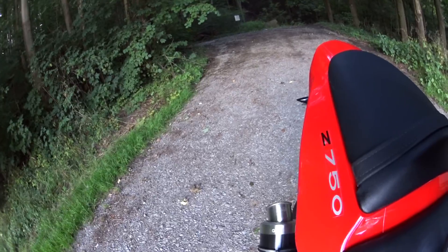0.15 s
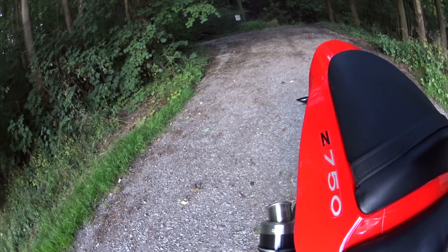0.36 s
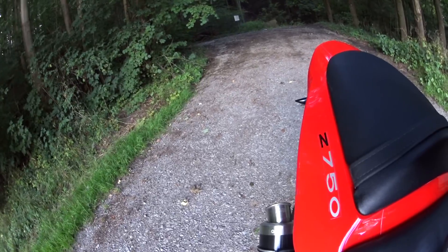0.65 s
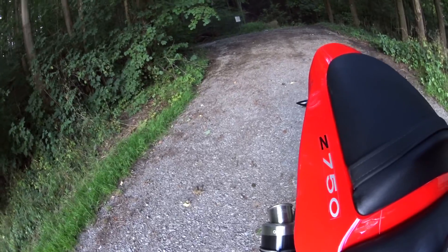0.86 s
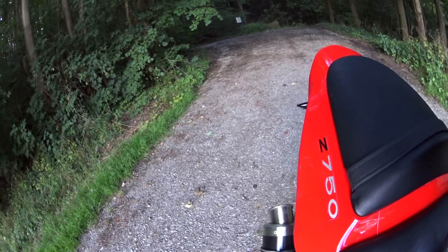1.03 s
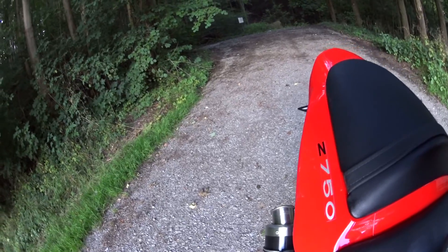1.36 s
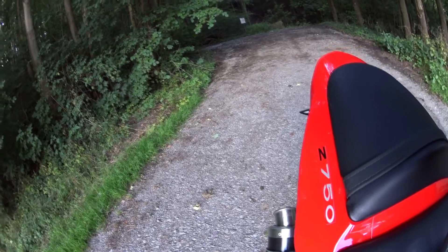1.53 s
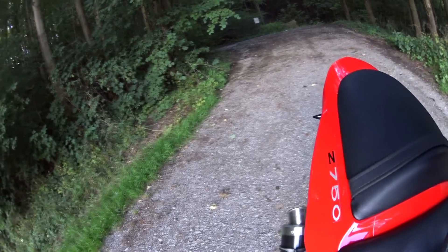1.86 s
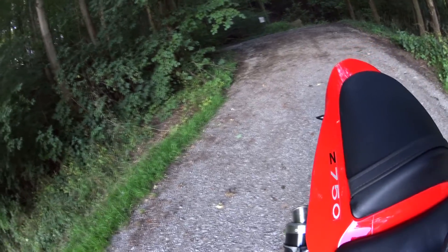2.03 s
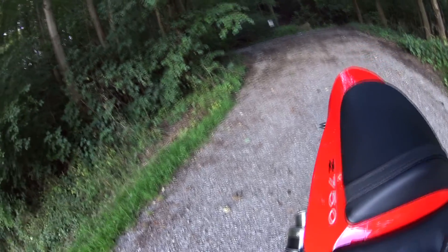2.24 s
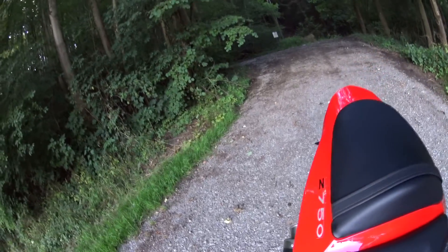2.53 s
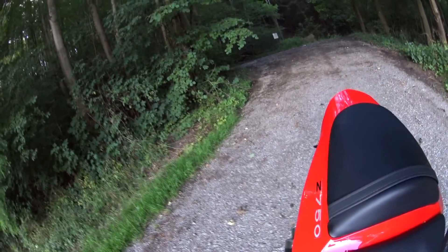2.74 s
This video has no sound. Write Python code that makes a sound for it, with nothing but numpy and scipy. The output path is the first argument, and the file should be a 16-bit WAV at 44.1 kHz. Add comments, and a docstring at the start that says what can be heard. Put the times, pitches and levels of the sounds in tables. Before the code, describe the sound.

A standing four-cylinder motorcycle falls from a high, raspy howl to a low throb, with two crackling backfire bursts, a near-stall stumble with metallic knocks, then idle; heard close to the silencer on a forest track.

```python
"""Motorcycle winding down

A four-cylinder motorcycle, standing on a forest track, winds down after a blip of the throttle.
The exhaust falls from a smooth howl (sine waves) to separate thumps (filtered pulses), with rushing gas and
clatter (coloured noise) and a whine and growl (sine waves). It backfires in two bursts (pressure pulses and
noise), stumbles with two knocks and settles into idle. We listen by the silencer; trees echo the backfires."""
import sys
import numpy as np
from scipy import signal
from scipy.fft import rfft, irfft, next_fast_len
from scipy.io import wavfile
from scipy.ndimage import uniform_filter1d, map_coordinates

SR = 44100
rng = np.random.default_rng(int(sys.argv[2]) if len(sys.argv) > 2 else 0)


def bounce(signal):
    """Save signal as a 16-bit WAV file at the path given by the first command-line argument."""
    frames = np.transpose(np.atleast_2d(signal))
    limited = np.clip(frames, -1, 1)
    pcm = np.round(limited * 32767).astype(np.int16)
    wavfile.write(sys.argv[1], SR, pcm)


N = 127890

# How fast the engine runs. Each row: time in seconds, firings per second.
ENGINE_RATE = [(0.0, 374.8), (0.1, 346.0), (0.25, 306.3), (0.4, 266.3), (0.55, 233.1), (0.7, 197.1),
               (0.9, 163.1), (1.05, 139.1), (1.25, 115.6), (1.45, 92.8), (1.6, 76.7), (1.75, 63.6),
               (1.87, 53.3), (2.0, 48.2), (2.15, 45.0), (2.28, 42.6), (2.43, 45.7), (2.6, 44.1),
               (2.9, 43.7)]
TOP_HZ = 11150  # upper limit of the sound


def amp(db):
    """Turn decibels into a gain."""
    return 10 ** (np.asarray(db) / 20)


def unit(x):
    """Scale a signal to an rms of 1."""
    return x / np.sqrt(np.mean(x ** 2) + 1e-20)


def along(points, hz):
    """Read (Hz, value) points at any frequency, on a logarithmic axis."""
    f, v = np.transpose(points)
    return np.interp(np.log(hz + 1), np.log(f + 1), v)


def curve(points):
    """Turn (seconds, value) points into one value per sample."""
    return np.interp(np.arange(N) / SR, *np.transpose(points))


def wobble(rate):
    """Make a smooth random curve with this many random points a second."""
    points = rng.standard_normal(4096)
    return map_coordinates(points, [np.arange(N) * rate / SR + 2], mode="mirror")


def filtered(x, response):
    """Multiply the spectrum of x by a response that depends on frequency."""
    m = next_fast_len(N + SR // 2)
    spectrum = rfft(x, m) * response(np.fft.rfftfreq(m, 1 / SR))
    return irfft(spectrum, m)[..., :N]


def ringing(x, colour, size=8192):
    """Filter x to a colour so that every pulse rings only after it strikes (minimum phase)."""
    gain = amp(along(colour, np.fft.rfftfreq(size, 1 / SR)))
    cepstrum = irfft(np.log(gain))
    fold = np.r_[1, np.full(size // 2 - 1, 2), np.zeros(size // 2)]
    impulse = irfft(np.exp(rfft(cepstrum * fold)))
    return signal.fftconvolve(x, impulse)[:N]


def noise(colour):
    """Stereo noise with a colour and the metalwork's narrow rings; its middle part has rms 1."""
    # Likeness of left and right. Each row: frequency in Hz, correlation (held between -1 and 1).
    alike = [(100, 2.5), (300, 0.46), (700, 1), (2000, 0.9), (9000, 0.8)]
    # Narrow rings of the metalwork. Each row: frequency in Hz, width in Hz, boost in dB.
    metal = [(764, 110, 2.5), (1434, 51, 5.5), (2003, 105, 3.5), (2273, 12, 10), (2416, 15, 4.5),
             (4170, 38, 4)]

    def response(hz):
        turn = np.arccos(np.clip(along(alike, hz), -1, 1)) / 2
        rings = sum(db / (1 + (2 * (hz - f) / width) ** 2) for f, width, db in metal)
        gain = amp(along(colour, hz) + rings) * (hz < TOP_HZ)
        return gain * np.array([np.cos(turn), np.sin(turn)])

    mid, side = filtered(rng.standard_normal((2, N)), response)
    return np.array([mid + side, mid - side]) / mid.std()


def firings(phase, colour, sizes, scatter_db, jitter):
    """One ringing pulse per firing, kept at an even level; jitter is a share of the period."""
    k = np.arange(np.ceil(phase[0]), phase[-1])
    chance = rng.standard_normal((1024, 2))[k.astype(int) % 1024]
    at = np.interp(k + jitter * chance[:, 0], phase, np.arange(N))
    push = np.take(sizes, k.astype(int), mode="wrap") * amp(scatter_db * chance[:, 1])
    # share each pulse between its two nearest samples
    i = at.astype(int)
    early = np.bincount(i, push * (1 - at + i), N + 1)
    late = np.bincount(i + 1, push * (at - i), N + 1)
    x = ringing((early + late)[:N], colour)
    power = uniform_filter1d(uniform_filter1d(x ** 2, size=4000), size=4000)
    return x / np.sqrt(np.abs(power) + 1e-12)


def gate(phase, depth, lag):
    """A swell once per firing, of rms 1; lag is a share of the period."""
    return unit(np.exp(depth * np.cos(2 * np.pi * (phase - lag))))


def trees(x, spread_s):
    """The nearest trunks scatter sound back as a blurred echo and a short tail, made from shaped noise."""
    # Each row: frequency in Hz, level in dB.
    echo_colour = [(60, 1), (200, -5.5), (1500, -1), (2300, 2.5), (2900, 4.5), (6000, 1.5), (11000, -1.5)]
    echo_s, echo_db = 0.029, -10.5
    tail_t60_s, tail_db = 0.43, -6  # T60: time to fall by 60 dB
    t = np.arange(SR // 2) / SR
    echo = np.exp(-((t - echo_s) / spread_s) ** 2)
    tail = amp(-60 * t / tail_t60_s)
    shape = amp(echo_db) * echo / np.linalg.norm(echo) + amp(tail_db) * tail / np.linalg.norm(tail)
    wet = signal.fftconvolve(x, shape * rng.standard_normal((2, len(t))), axes=1)[:, :N]
    return filtered(wet, lambda hz: amp(along(echo_colour, hz)))


def clatter():
    """The valve gear clatters: steady coloured noise with a quick random flutter."""
    # Each row: frequency in Hz, level in dB.
    clatter_colour = [(25, -30), (100, -5), (280, 10.5), (400, -2), (520, 4.5), (650, 0.5), (900, 0.5),
                      (1250, -5.5), (1450, 2), (2000, -2), (2600, -4), (3600, -5), (5400, -9),
                      (6300, -19.5), (8000, -18), (10500, -18.5)]
    level_db = -42 + 1.0 * wobble(220)
    return amp(level_db) * noise(clatter_colour)


def burble():
    """Uneven combustion with the throttle shut gives a low burble, made from low noise."""
    # Each row: time in seconds, level in dB.
    burble_level = [(0, -60), (.2, -47), (.4, -39), (.55, -35.5), (.7, -31.5), (.85, -36), (1.05, -30.5),
                    (1.3, -31), (1.5, -34), (1.75, -35), (2.05, -41)]
    # Each row: frequency in Hz, level in dB.
    burble_colour = [(25, -5), (55, -22), (90, 8), (150, 1), (190, 5), (250, 10.5), (330, -16.5),
                     (500, -35)]
    return amp(curve(burble_level)) * noise(burble_colour)


def rushing_gas(phase):
    """Turbulent gas leaves the pipe in puffs: noise that swells gently with each firing."""
    # Levels of the gas's body and its hiss. Each row: time in seconds, level in dB.
    body_level = [(0, -24.5), (.08, -24.5), (.21, -26), (.34, -22.5), (.44, -24), (.52, -27), (.77, -28),
                  (.89, -29), (1.1, -31), (1.36, -34.5), (1.6, -43), (1.85, -55), (2.1, -73)]
    hiss_level = [(.04, -27), (.21, -33.5), (.35, -32.5), (.5, -38), (.85, -44.5), (1.1, -49), (1.4, -77)]
    # Their colours. Each row: frequency in Hz, level in dB.
    body_colour = [(25, -49), (120, -22), (220, 0), (330, 1), (420, -1.5), (620, -0.5), (850, -5.5),
                   (1200, -2), (1480, -0.5), (1900, -4), (2900, -6.5), (4200, -7), (5300, -10.5),
                   (6300, -19.5), (11000, -23)]
    hiss_colour = [(2000, -2.5), (5000, 5), (7500, 3), (9000, 1), (10500, 5), (12000, -22)]
    puffs = gate(phase, depth=0.15, lag=0.56) * amp(0.63 * wobble(44.46))  # wobble in dB
    body = amp(curve(body_level)) * noise(body_colour)
    hiss = amp(curve(hiss_level)) * noise(hiss_colour)
    return puffs * (body + hiss)


def knocks():
    """The drive knocks as the crank nearly stalls: short sine rings that die away."""
    # Each row: start in seconds, starting level in dB.
    knock_times = [(1.894, -29.5), (1.932, -25)]
    knock_hz, knock_t60_s = 1433, 0.028
    out = np.zeros(N)
    for s, db in knock_times:
        t = np.maximum(np.arange(N) / SR - s, 0)
        out += amp(db - 60 * t / knock_t60_s) * np.sin(2 * np.pi * knock_hz * t)
    return out


def backfires():
    """Unburnt fuel goes off in the pipe: a pressure push rings the silencer, with a short spit of gas."""
    # Each row: start in seconds, push level in dB, spit level in dB, spit length before it fades in seconds.
    pops = [(0.2785, -9, -12.5, 0.0079), (0.2864, -8, -21, 0.0016), (0.2928, -4, -17, 0.0024),
            (0.919, -10.5, -22.5, 0.0072), (0.9258, -8, -14.5, 0.0097)]
    # Colours of the spit and the silencer's ring. Each row: frequency in Hz, level in dB.
    spit_colour = [(60, 1), (300, 9.5), (700, 5.5), (1100, -1.5), (1900, 7.5), (2800, 1.5), (4500, -1),
                   (6200, -4.5), (8500, -2.5), (11000, -3.5)]
    boom_colour = [(25, -12), (90, 0), (160, -17.5), (235, 13.5), (320, -8), (420, -2), (650, -3),
                   (1200, -31)]
    spit_attack_s, spit_t60_s, push_s, boom_db = 0.00059, 0.029, 0.00072, 4
    pushes, spits = np.zeros(N), np.zeros(N)
    for s, push_db, spit_db, length in pops:
        t = np.maximum(np.arange(N) / SR - s, 0)
        u = t / push_s
        pushes -= amp(push_db) * np.e * u * (1 - u + u * u / 6) * np.exp(-u)
        fade_db = 60 * np.maximum(t - length, 0) / spit_t60_s
        spits += amp(spit_db - fade_db) * (1 - np.exp(-t / spit_attack_s))
    boom = amp(boom_db) * ringing(pushes, boom_colour)
    return pushes + boom + spits * noise(spit_colour)


def whine(phase):
    """Crank and gears whine: their partials flare up as they slide through the casing's resonances."""
    # Partials. Each row: multiple of the firing rate, level in dB.
    whine_orders = [(4, 4.5), (4.5, -11), (5, -2), (6, -1), (6.5, -16), (7, -6.5), (8, -0.5), (8.6, -4)]
    # Overall level. Each row: time in seconds, level in dB.
    whine_level = [(0, -24.5), (.09, -22.5), (.2, -28), (.43, -25), (.58, -27.5), (.68, -33.5),
                   (.76, -31.5), (.9, -40.5), (1.6, -46.5), (2.0, -57)]
    # Casing resonances. Each row: frequency in Hz, width in Hz, level in dB.
    casing = [(425, 95, -0.5), (666, 93, -4), (1379, 95, -3), (1520, 43, -0.5), (1590, 142, -2.5),
              (2486, 91, -2), (3170, 250, 0)]
    casing_floor_db = -19  # between the resonances
    blur_rad, flutter_db = 0.45, 1.5
    rate, out = curve(ENGINE_RATE), np.zeros(N)
    for k, db in whine_orders:
        power = sum(amp(level) ** 2 / (1 + (2 * (k * rate - hz) / width) ** 4)
                    for hz, width, level in casing)
        casing_gain = np.sqrt(2 * (power + amp(casing_floor_db) ** 2))
        angle = 2 * np.pi * (k * phase + rng.random()) + blur_rad * wobble(130)
        out += casing_gain * amp(db + flutter_db * wobble(50.56)) * np.cos(angle)
    return amp(curve(whine_level)) * out


def growl(phase, waver_db):
    """Unequal cylinders put wavering sine lines halfway between the main multiples of the firing rate."""
    # Partials. Each row: multiple of the firing rate, level in dB.
    growl_orders = [(1.5, 1), (2.5, -5)]
    # Overall level. Each row: time in seconds, level in dB.
    growl_level = [(0, -25.5), (.08, -45), (.45, -40), (.58, -51), (.8, -43), (1.4, -48), (1.7, -77)]
    lines = np.zeros(N)
    for k, db in growl_orders:
        level = amp(db + waver_db * wobble(20))
        angle = 2 * np.pi * (k * phase + rng.random()) + 0.5 * wobble(18)
        lines += level * np.cos(angle)
    return np.sqrt(2) * amp(curve(growl_level)) * lines


def exhaust(phase):
    """Firing pulses: a brassy rasp at speed; towards idle single thumps, each with a chuff of gas."""
    # Levels of the rasp and the thumps, uneven in the stumble. Each row: time in seconds, level in dB.
    rasp_level = [(0, -21), (.08, -22.5), (.2, -26.5), (.42, -30), (.52, -49), (.78, -58), (1.4, -59),
                  (1.9, -69)]
    thump_level = [(.7, -90), (1.2, -30), (1.42, -27), (1.58, -27.5), (1.65, -29.5), (1.68, -25.5),
                   (1.712, -36), (1.735, -26), (1.772, -34.5), (1.79, -24), (1.825, -36.5), (1.862, -33.5),
                   (1.876, -42), (1.892, -28), (1.935, -26.5), (1.975, -33.5), (2.012, -44), (2.03, -28.5),
                   (2.16, -30), (2.32, -31), (2.38, -28.5), (2.9, -28.5)]
    # Colours of the rasp, the silencer's thump and the chuff. Each row: frequency in Hz, level in dB.
    rasp_colour = [(60, -65), (300, -27), (700, -12), (1080, -4), (1400, -10), (1800, -3.5), (2200, -8.5),
                   (3100, -11.5), (4200, -12), (6000, -37), (11000, -53)]
    pipe = [(20, -55), (44, -11.5), (90, -5), (135, -6.5), (176, -9.5), (228, 1), (268, -8.5), (310, -13.5),
            (390, -32.5), (500, -21.5), (600, -44), (1200, -59)]
    chuff_colour = [(200, -17), (600, -1), (1600, 1), (3500, -8), (6000, -18)]
    # Relative strength of each cylinder, in firing order.
    cylinders = [0.85, 1.5, 0.45, 1.1]
    smear_s = 0.009  # the pipe delays the highest frequencies by this much
    chuff_db, chuff_s = -11.5, 0.0035  # level relative to the thump, rise time
    rasp = firings(phase, rasp_colour, cylinders, scatter_db=1, jitter=0.009)
    rasp = filtered(rasp, lambda hz: np.exp(-1j * np.pi * smear_s * hz ** 2 / TOP_HZ))
    thumps = firings(phase, pipe, [1], scatter_db=.9, jitter=.006)
    age = (phase % 1) / curve(ENGINE_RATE) / chuff_s  # time since the firing, in rise times
    chuffs = age * np.exp(1 - age) * amp(chuff_db) * noise(chuff_colour)
    return amp(curve(rasp_level)) * rasp + amp(curve(thump_level)) * (chuffs - thumps)


def howl(phase, waver_db):
    """The smooth exhaust howl: sine waves at one, two and three times the firing rate."""
    # One table for each multiple. Each row: time in seconds, level in dB.
    first = [(0, -17.5), (.09, -17), (.14, -13), (.25, -13.5), (.3, -16.5), (.42, -12.5), (.58, -11.5),
             (.64, -13.5), (.68, -17.5), (.88, -19.5), (.95, -25.5), (1.0, -21), (1.2, -22), (1.4, -21.5),
             (1.5, -26), (1.61, -30.5), (1.7, -70)]
    second = [(0, -31), (.22, -28), (.33, -31.5), (.5, -25.5), (0.701, -27.5), (.85, -32.5), (.96, -30),
              (1.082, -26), (1.2, -20), (1.28, -28), (1.37, -33), (1.6, -63)]
    third = [(0, -36), (.3, -45), (.45, -33.5), (.53, -41), (.63, -28.5), (.72, -32.5), (.9, -34),
             (1.03, -32.5), (1.2, -44), (1.5, -41)]
    out = np.zeros(N)
    for k, level in enumerate([first, second, third], 1):
        gain = np.sqrt(2) * amp(curve(level) + waver_db * wobble(60.84))
        out += gain * np.cos(2 * np.pi * k * phase)
    return out


def scene():
    """The crank times the engine's sounds; level and phase by frequency place the bike left to right."""
    # Left level over right level. Each row: frequency in Hz, difference in dB.
    balance = [(50, 0), (110, 0.5), (200, -2), (350, -1), (700, -4.5), (1400, -5.5), (3500, -3.5),
               (6000, -3), (10000, -1.5)]
    # How far the left side leads. Each row: frequency in Hz, phase in radians.
    lead = [(60, 0.45), (200, -0.26), (520, 0.39), (1100, 0.33), (2400, 0.49), (4000, .1), (7000, -0.13)]
    catch_s = 2.0315  # the idle catches here, and the firing count is set to zero
    howl_balance_db = -3  # extra left-over-right level of the howl
    turns = np.cumsum(curve(ENGINE_RATE)) / SR
    phase = turns - np.interp(catch_s, np.arange(N) / SR, turns)  # counted in firings
    sides = np.array([[.5], [-.5]])  # half of each difference goes to each side
    pops = backfires()
    note = howl(phase + 0.013 * wobble(70.85), waver_db=0.97) * amp(howl_balance_db * sides)
    gas = rushing_gas(phase) + clatter() + burble()
    bike = note + growl(phase, waver_db=2) + exhaust(phase) + whine(phase) + gas + knocks() + pops

    def placing(hz):
        return amp(along(balance, hz) * sides) * np.exp(1j * along(lead, hz) * sides)

    return filtered(bike, placing) + trees(pops, spread_s=0.0047)


def record(dry):
    """Round off the highest peaks, then remove everything above the upper frequency limit."""
    ceiling, knee = .9, 10  # a larger knee bends more sharply
    held = dry / (1 + np.abs(dry / ceiling) ** knee) ** (1 / knee)
    return filtered(held, lambda hz: np.clip((TOP_HZ - hz) / 150 + .5, 0, 1))


dry = scene()
out = record(dry)
bounce(out)
```